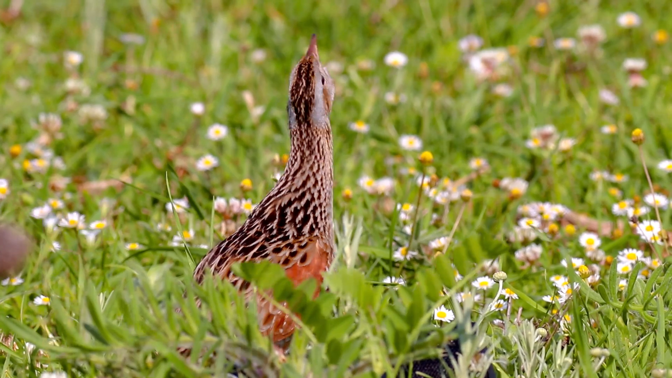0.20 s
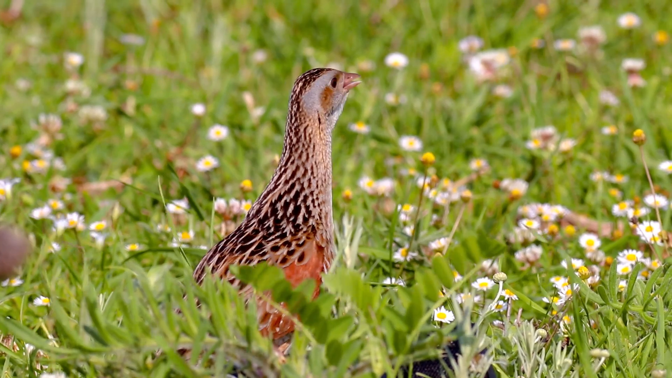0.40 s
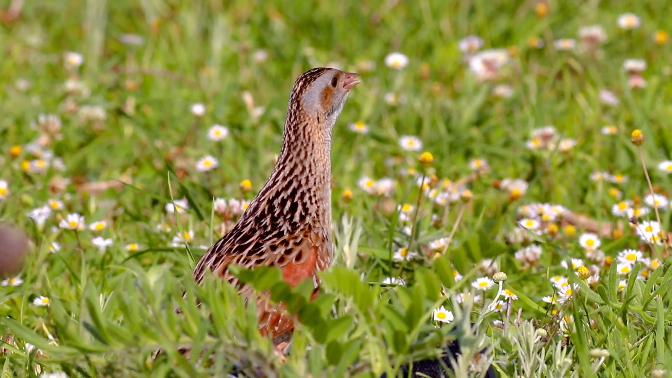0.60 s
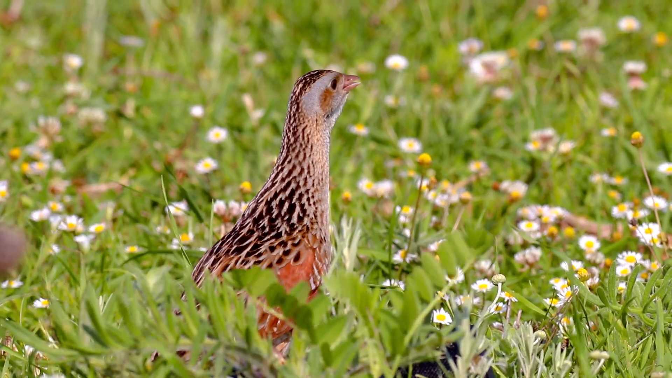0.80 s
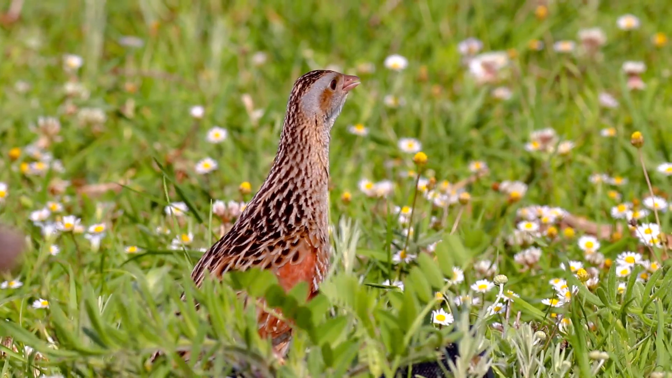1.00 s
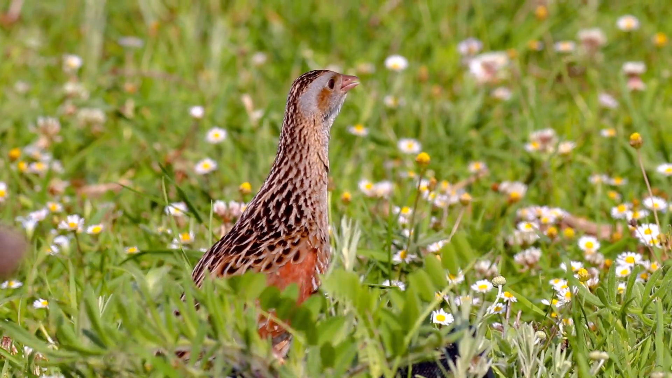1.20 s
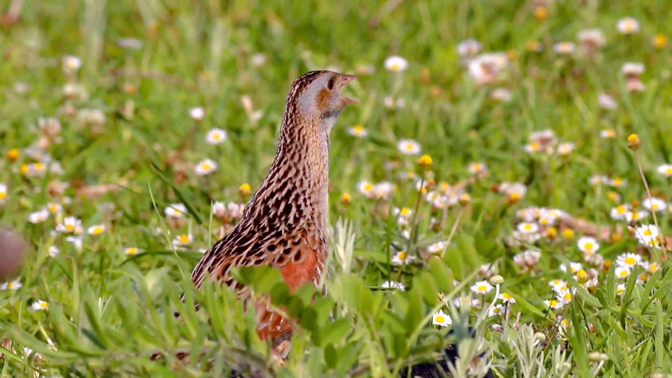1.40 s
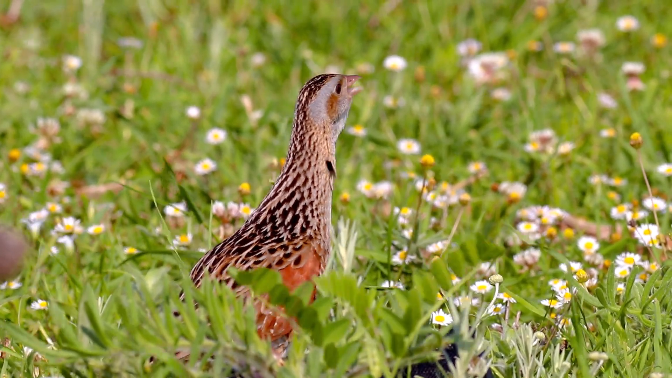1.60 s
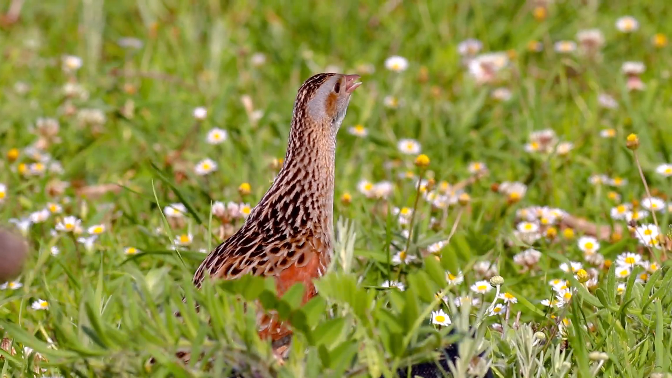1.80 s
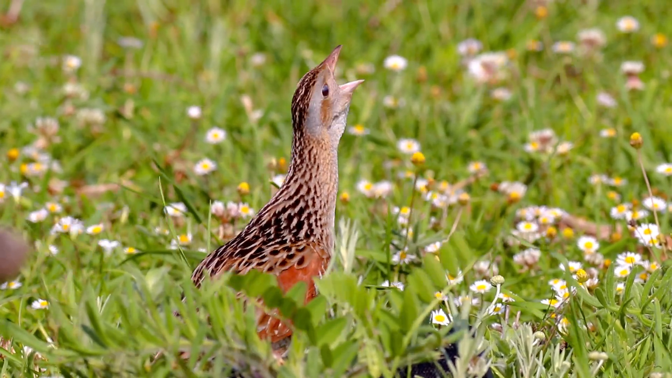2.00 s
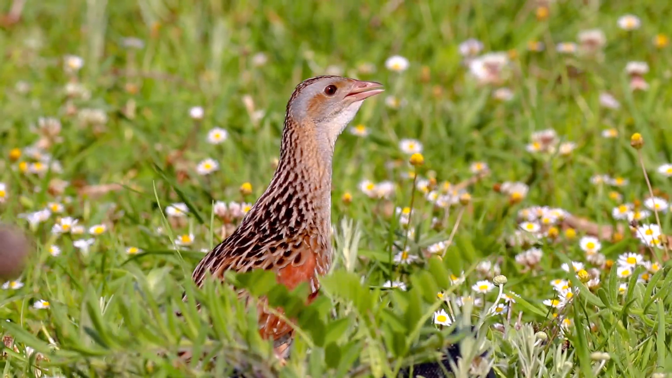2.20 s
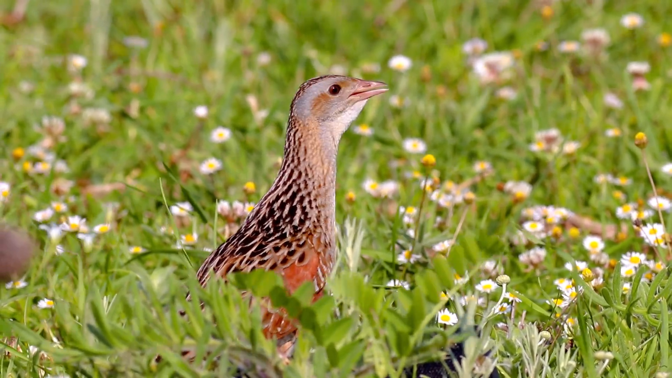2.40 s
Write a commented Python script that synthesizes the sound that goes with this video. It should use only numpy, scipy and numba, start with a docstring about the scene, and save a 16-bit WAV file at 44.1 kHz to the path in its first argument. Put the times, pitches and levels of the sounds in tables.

```python
"""Corn crake in a meadow, close to the microphone

A corn crake rasps close by: each syllable is a run of clicks, mostly in threes, ringing its throat.
A far hedge returns a blurred echo; the first syllable precedes the start, so only its echo is heard.
Two near crickets chirp in short gliding tones, a small bird trills, a far insect chorus throbs as
narrow noise, distant traffic hums in bands of noise, and wind buffets the microphone ports.
The camera's gain control ducks everything under the calls."""
import sys
import numpy as np
from scipy import signal
from scipy.io import wavfile
from scipy.ndimage import uniform_filter1d, map_coordinates
from numba import njit

SR = 44100
rng = np.random.default_rng(int(sys.argv[2]) if len(sys.argv) > 2 else 0)


def invert_db(level):
    """Linear amplitude ratio for a level in decibels (20 dB per decade), elementwise."""
    return 10 ** (np.asarray(level, dtype=float) / 20)


def dump(signal):
    """Clip the signal to [-1, 1] and save it as 16-bit WAV at the path in sys.argv[1]."""
    limited = np.clip(np.atleast_2d(signal).T, -1, 1)
    pcm = np.round(limited * 32767).astype(np.int16)
    wavfile.write(sys.argv[1], SR, pcm)


N = 105840
LEAD = 12000  # samples of calling kept ahead of the start, for the echo

# click groups of the crake: start_s, then gap_ms to each following click
CLICK_GROUPS = [(-.2470, 6.1, 7.8), (-.2230, 7.5, 8.2), (-.1980, 7, 8.8), (-.1730, 7.2, 8.9),
                (-.1490, 7.8, 9.4), (-.1240, 8.3, 11), (.2015, 6.1, 7.1), (.2250, 7.0, 7.9),
                (.2503, 6.3, 7.9), (.2743, 6.7, 7.8), (.2984, 6.8, 7.5), (.3220, 6.8, 7.5),
                (.3463, 7.8, 8.5), (.3722, 12.2), (1.5051, 6.1, 7.8), (1.5290, 7.8, 8.2),
                (1.5547, 6.9, 8.8), (1.5792, 7.2, 8.9), (1.6038, 7.8, 9.4), (1.6289, 8.3, 11.0),
                (1.9524, 6.1, 7.5), (1.9759, 6.9, 7.9), (2.0012, 6.6, 7.9), (2.0254, 6.9, 7.8),
                (2.0494, 6.9, 8.1), (2.0737, 6.8, 8.5), (2.0982, 8.3, 8.5), (2.1251,)]
# first, second and third click of a group: level_db
CLICK_PLACES = [-3, -4.6, -2.2]
# syllable starts: start_s
SYLLABLE_STARTS = [-.25, .2, 1.5, 1.95]
# delivery of each syllable as the beak turns: level_db, treble_lift_db_per_octave, fading_db_per_s
DELIVERY = [(0.1, -1, 3), (0.1, 0.5, -7.5), (0.1, 0.1, -17), (0.1, 0, -9.5)]
# resonances of beak and throat: pitch_hz, snap_db, returns_db, drift_db_per_s through a syllable
THROAT = [(1227, -19, -18, 13), (1900, -15.5, -50, -79), (2334, 3, -0.5, 16.5), (3275, -38, -1.5, 9.5),
          (4540, -24, -7, -7), (5640, -6, -11.5, 23), (7013, -4.5, -6.5, 0), (7980, -24, -25.5, 37),
          (9730, -37, -24, 3), (12700, -40, -34.5, -17)]
# width of one pass of each throat resonance, which is passed twice: width_hz
THROAT_WIDTHS = [350, 700, 400, 600, 1200, 1900, 900, 1300, 2600, 3000]
# returns of a click along the windpipe: delay_ms, level_db
WINDPIPE_RETURNS = [(1.0, 0), (1.83, 1), (2.70, -1.5), (3.52, -5)]
# band of the unresonant edge of each return: low_hz, high_hz
EDGE_BAND = [2640, 7540]
# phrases of the near cricket with falling chirps: first_chirp_centre_s, level_db, count of chirps
FALLING_CRICKET = [(.143, -52, dict(count=2)), (.507, -45.5, dict(count=3)), (.735, -63, dict(count=1)),
                   (.765, -47, dict(count=3)), (.995, -60, dict(count=1)), (1.024, -49.5, dict(count=3)),
                   (1.152, -62, dict(count=2)), (1.234, -54, dict(count=4)), (1.497, -60, dict(count=1)),
                   (1.752, -56, dict(count=3)), (2.285, -47, dict(count=3))]
# phrases of the near cricket with almost level chirps: first_chirp_centre_s, level_db, count of chirps
LEVEL_CRICKET = [(.126, -47, dict(count=3)), (.592, -47.5, dict(count=4)), (.814, -48, dict(count=3)),
                 (1.054, -49, dict(count=3)), (1.404, -49.5, dict(count=3)), (1.686, -50, dict(count=1)),
                 (1.851, -49, dict(count=3)), (2.312, -47, dict(count=3))]
# phrases of the small bird: first_note_centre_s, level_db, count of notes
BIRD_TRILL = [(1.075, -57, dict(count=6)), (1.222, -58, dict(count=2)), (1.272, -50, dict(count=3))]
# relative spectrum of distant traffic and air: pitch_hz, density_db per Hz
TRAFFIC_SPECTRUM = [(15, -46), (25, -24.5), (117, 0), (309, -6.5), (384, -5.5), (591, -5.5), (962, -3),
                    (2350, -27), (4140, -20), (4870, -20.5), (5880, -26), (14000, -34.5), (16000, -41)]
# stereo lean of the traffic and air: pitch_hz, left_minus_right_db
TRAFFIC_PAN = [(60, 1.0), (110, -1.5), (200, 3.5), (380, -1), (700, 8.5), (1290, 0), (2380, 2), (4400, 0),
               (8120, 1.5), (15000, 2.5)]
# course of the wind at the ports: time_s, level_db
WIND_COURSE = [(0.0, -63), (0.16, -54), (0.24, -71), (0.51, -90), (1.47, -60.5), (1.6, -69), (1.91, -46.5),
               (2.07, -57), (2.31, -42), (2.4, -57)]


def set_level(x, db):
    """Scale to an RMS level."""
    return x * invert_db(db) / np.sqrt(np.mean(x ** 2))


def ring(x, hz, width_hz):
    """Resonance with gain 1 at its centre."""
    return signal.lfilter(*signal.iirpeak(min(hz, .45 * SR), hz / width_hz, fs=SR), x)


def along(table, hz):
    """Read a table of (Hz, dB) on a logarithmic pitch axis."""
    pitch_hz, db = np.array(table).T
    return np.interp(np.log(hz), np.log(pitch_hz), db)


def clicks(times, sizes):
    """Impulses shared between neighbouring samples, on a time line that starts LEAD samples early."""
    out = np.zeros(N + LEAD + 999)
    at = np.asarray(times) * SR + LEAD
    np.add.at(out, at.astype(int), sizes * (1 - at % 1))
    np.add.at(out, at.astype(int) + 1, sizes * (at % 1))
    return out[:N + LEAD]


def walk(rate):
    """Random levels held 1 / rate s and slewed."""
    k = int(SR / rate)
    held = np.repeat(rng.standard_normal(N // k + 1), k)
    return 0.79 * uniform_filter1d(uniform_filter1d(held, k), k)[:N]


def windpipe_returns(snap, times, db, chance, scatter_db):
    """Each click returns along the windpipe, ever duller and flipping sign, with a short rasp of air."""
    jitter, dulling = .016, .25
    rasp_s, rasp_db = .001, -19
    back = 0
    for k, (ms, return_db) in enumerate(WINDPIPE_RETURNS):
        when = times + ms / 1000 * (1 + jitter * chance[5 + k])
        pulse = clicks(when, invert_db(db + return_db + scatter_db * chance[1 + k]))
        dull = signal.lfilter([1 - k * dulling], [1, -k * dulling], pulse)
        back = back + (-1) ** (k + 1) * dull
    air = signal.lfilter([1], [1, -np.exp(-1 / rasp_s / SR)], -snap)
    return back + invert_db(rasp_db) * air * rng.standard_normal(len(snap))


def crake():
    """Clicks snap in the beak and, with their windpipe returns, ring the beak and throat."""
    crake_db, scatter_db, edge_db = 25, 1.0, -16.5
    late_ms, late_db = 12, -6.5  # a click after a longer wait than this is weak
    times, db = [], []
    for start_s, *gaps_ms in CLICK_GROUPS:
        for k, gap_ms in enumerate([0, *gaps_ms]):
            times.append(start_s + sum(gaps_ms[:k]) / 1000)
            db.append(CLICK_PLACES[k] + late_db * (gap_ms > late_ms))
    times, db = np.array(times), np.array(db)
    chance = rng.standard_normal((len(times), 10)).T
    snap = -clicks(times, invert_db(db + scatter_db * chance[0]))
    back = windpipe_returns(snap, times, db, chance, scatter_db)

    now = (np.arange(len(snap)) - LEAD) / SR
    which = np.maximum(np.searchsorted(SYLLABLE_STARTS, now) - 1, 0)
    age = np.clip(now - np.array(SYLLABLE_STARTS)[which], 0, .2)
    loud, lift, fade = np.array(DELIVERY)[which].T

    edge_filter = signal.butter(3, EDGE_BAND, "band", fs=SR, output="sos")
    out = signal.sosfilt(edge_filter, back * invert_db(edge_db + loud + fade * age))
    for k, ((hz, snap_db, back_db, drift), width) in enumerate(zip(THROAT, THROAT_WIDTHS)):
        turn_db = lift * np.log2(hz / 4000)
        push = (invert_db(snap_db) * snap + invert_db(back_db) * back) * invert_db(loud + turn_db + (fade + drift) * age)
        out = out + (-1) ** k * ring(ring(push, hz, width), hz, width)
    return invert_db(crake_db) * out


def meadow(voice):
    """Direct sound, scatter round the camera and in grass, far hedge echo; unrelated left and right."""
    pan_db, port_lag_s = -1.5, .00002  # left minus right level; the left port hears the bird first
    housing_db, housing_hz, housing_t60_s = -4, 6220, 0.0077
    grass_db, grass_t60_s = -11.5, .055
    echo_s, echo_spread_s, echo_db, echo_pan_db = 0.18, 0.067, -34, -2
    echo_hz, echo_width_hz, lift_db, lift_width_hz = 6230, 10200, 4, 560
    t = np.arange(int(.4 * SR)) / SR
    out = []
    for side in (.5, -.5):
        n = rng.standard_normal((3, len(t)))
        bright = signal.butter(2, housing_hz, "high", fs=SR, output="sos")
        housing = signal.sosfilt(bright, n[0] * invert_db(-60 * t / housing_t60_s))
        grass = n[1] * invert_db(-60 * t / grass_t60_s)
        hedge = ring(n[2], echo_hz, echo_width_hz) + invert_db(lift_db) * ring(n[2], echo_hz, lift_width_hz)
        echo = hedge * np.exp(-.5 * ((t - echo_s) / echo_spread_s) ** 2)
        space = set_level(housing, housing_db) + set_level(grass, grass_db)
        space = space + set_level(echo, echo_db + side * echo_pan_db)
        space = space / np.sqrt(len(t))  # levels become energies relative to the unpanned direct sound
        direct = map_coordinates(voice, [np.arange(len(voice)) + side * port_lag_s * SR])
        scattered = signal.fftconvolve(voice, space)[:len(voice)]
        out.append(direct * invert_db(side * pan_db) + scattered)
    return np.array(out)[:, LEAD:]


def chirps(phrases, every_s, hz, fall_hz_per_s, length_s, pan_db, climb_hz_per_s=0):
    """Short gliding tones at an even pace, each slightly off in pitch and level."""
    t, out = np.arange(N) / SR, np.zeros(N)
    for start, db, n in phrases:
        for k, (detune, scatter, phase) in enumerate(rng.standard_normal((n["count"], 3))):
            at = start + k * every_s
            s = slice(max(int((at - .03) * SR), 0), int((at + .03) * SR))
            u = t[s] - at
            f = hz * (1 + 0.0021 * detune) + climb_hz_per_s * (at - phrases[0][0])
            tone = np.sin(2 * np.pi * (f * u - fall_hz_per_s * u * u / 2 + phase))
            out[s] += invert_db(db + 0.89 * scatter) * np.exp(-(u / length_s) ** 4) * tone
    return out * invert_db(np.array([[.5], [-.5]]) * pan_db)


def near_crickets():
    """Two crickets: steeply falling chirps to the left, almost level ones to the right."""
    every_s = .0315
    falling = chirps(FALLING_CRICKET, every_s, 4770, 20000, 0.011, pan_db=12.5)
    return falling + chirps(LEVEL_CRICKET, every_s, 5200, 3000, 0.0077, pan_db=-4.0)


def small_bird():
    """A trill of steeply falling notes to the left, each starting higher as the trill climbs."""
    return chirps(BIRD_TRILL, .027, 5210, 89000, 0.0072, pan_db=12.0, climb_hz_per_s=2100)


def far_chorus():
    """Far insects merge into narrow noise that throbs separately left and right."""
    hz, width_hz, chorus_db, throb_rate_hz = 4860, 390, -53.5, 58.7
    sides = []
    for _ in "lr":
        noise = ring(ring(rng.standard_normal(N), hz, width_hz), hz, width_hz)
        sides.append(noise * invert_db(walk(throb_rate_hz)))
    return set_level(np.array(sides), chorus_db)


def distant_traffic():
    """Third-octave bands of distant traffic and air; the bass is nearly alike left and right."""
    out, swell = 0, walk(0.5)
    for hz in 40 * 2 ** np.arange(0, 8.7, 1 / 3):
        mid, side = (ring(ring(rng.standard_normal(N), hz, hz / 3), hz, hz / 3) for _ in "ms")
        db = along(TRAFFIC_SPECTRUM, hz) + 0.2 * swell + 2.8 * walk(12.04)
        db = db + along(TRAFFIC_PAN, hz) * np.array([[.5], [-.5]])
        spread = min(0.095 + hz / 1400.0, 1)
        out = out + invert_db(db) * (mid + spread * side * np.array([[1], [-1]]))
    return set_level(out, -42.5)


def wind():
    """Low buffeting noise, partly shared by the microphone ports."""
    low_band = signal.butter(2, [35, 95], "band", fs=SR, output="sos")
    n = signal.sosfilt(low_band, rng.standard_normal((3, N)))
    gust_db = np.interp(np.arange(N) / SR, *np.array(WIND_COURSE).T) + 1.3 * walk(9)
    return set_level(n[0] + 0.95 * n[1:], 0) * invert_db(gust_db)


def scene():
    """The crake in its meadow, over insects, bird, traffic and wind."""
    return meadow(crake()) + near_crickets() + small_bird() + far_chorus() + distant_traffic() + wind()


@njit
def follow(x, up, down):
    """Envelope with separate rise and fall."""
    y, e = np.empty(len(x)), 0.
    for i in range(len(x)):
        e += (x[i] - e) * (up if x[i] > e else down)
        y[i] = e
    return y


def gain_control(x):
    """The envelope of the louder channel turns both channels down above a threshold."""
    threshold_db, ratio, attack_s, release_s = -36, 1.6, .014, 0.021
    e = follow(np.abs(x).max(axis=0), 1 / (attack_s * SR), 1 / (release_s * SR))
    return x * (invert_db(threshold_db) / np.maximum(e, invert_db(threshold_db))) ** (1 - 1 / ratio)


def low_pass(x):
    """Removes everything above the highest recorded frequency."""
    return signal.sosfilt(signal.butter(12, 16520, fs=SR, output="sos"), x)


def record(dry):
    """The camera's gain control ducks the sound under the calls, then peaks are rounded."""
    ceiling = 1.2
    mix = ceiling * np.tanh(gain_control(dry) / ceiling)
    return low_pass(mix)


dry = scene()
out = record(dry)
dump(out)
```